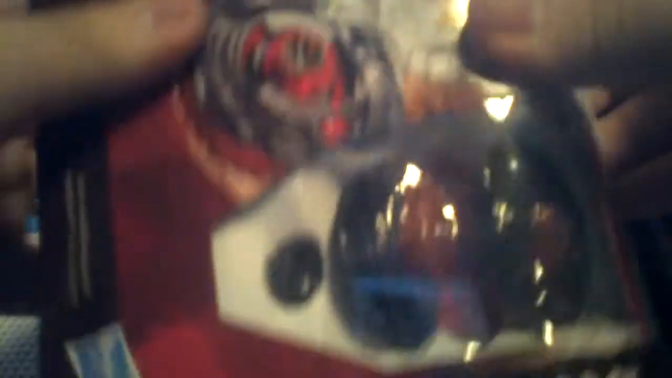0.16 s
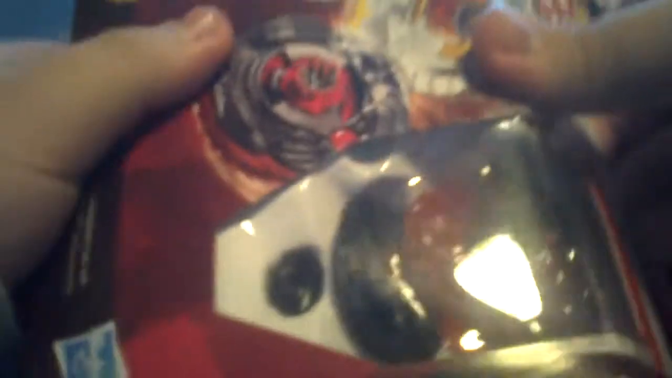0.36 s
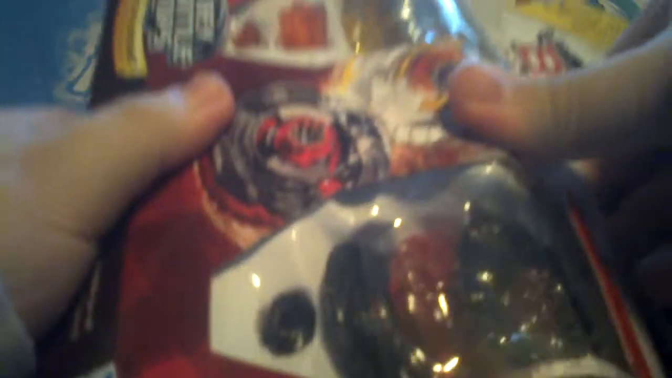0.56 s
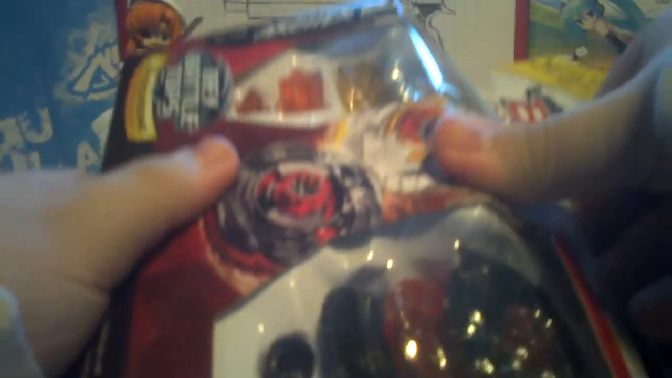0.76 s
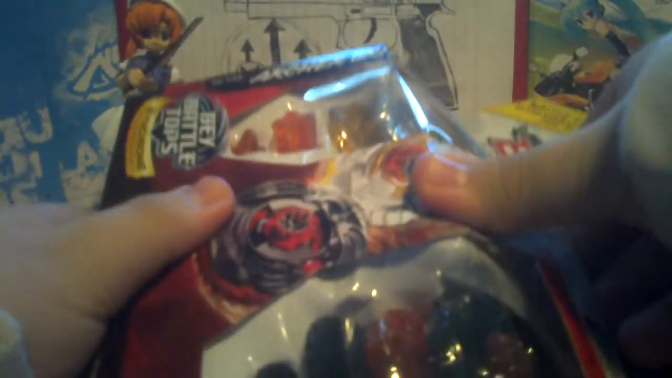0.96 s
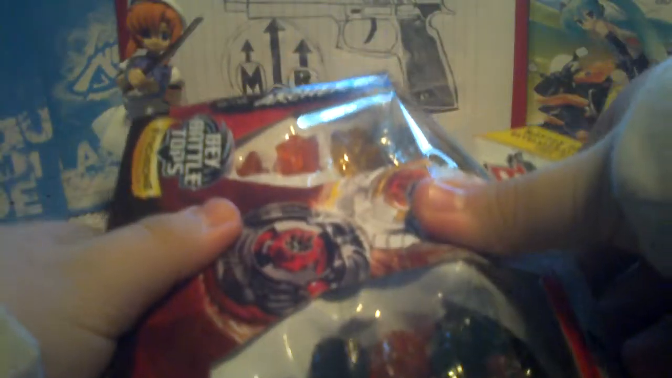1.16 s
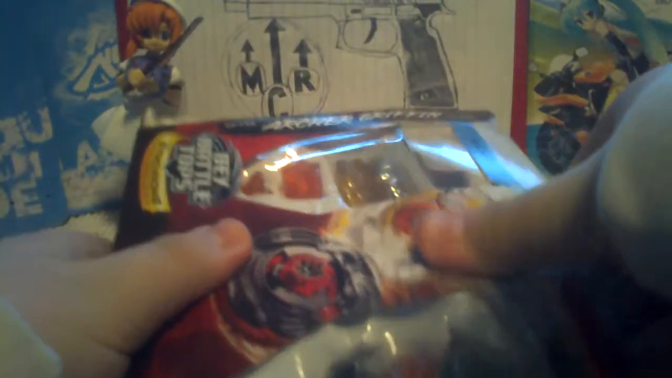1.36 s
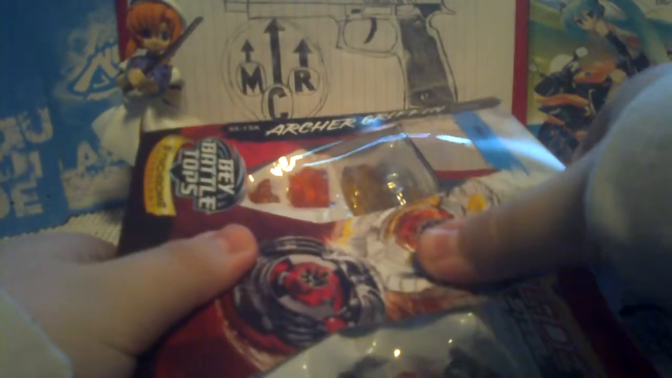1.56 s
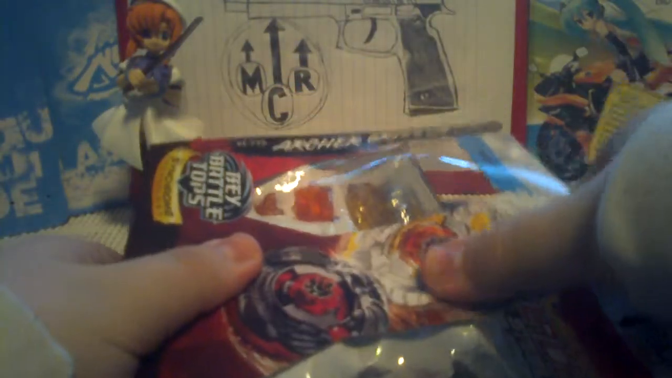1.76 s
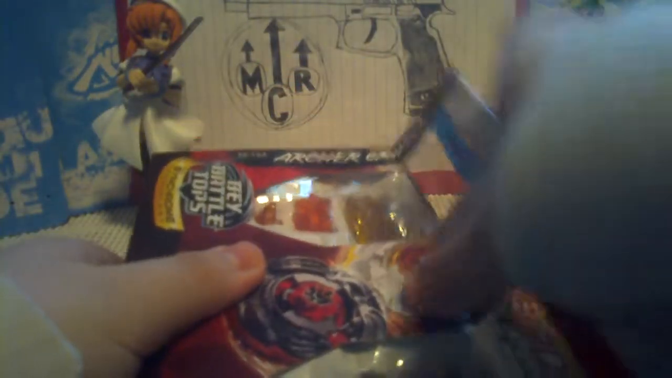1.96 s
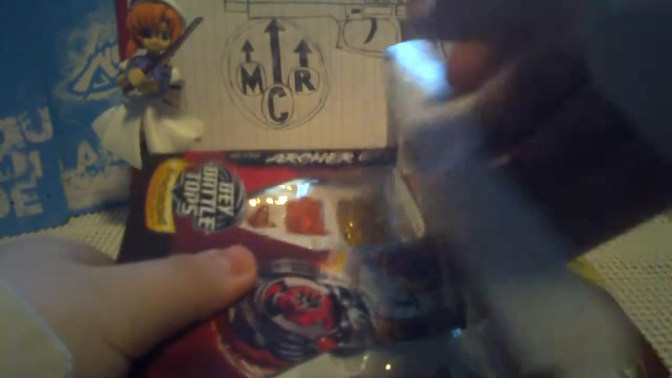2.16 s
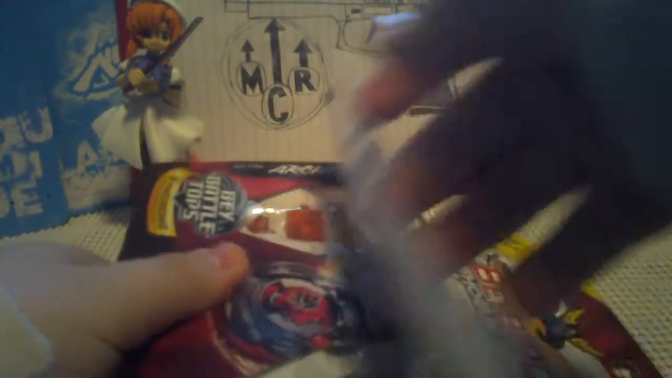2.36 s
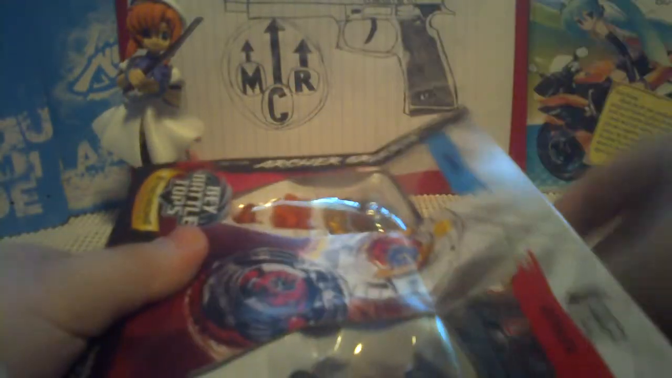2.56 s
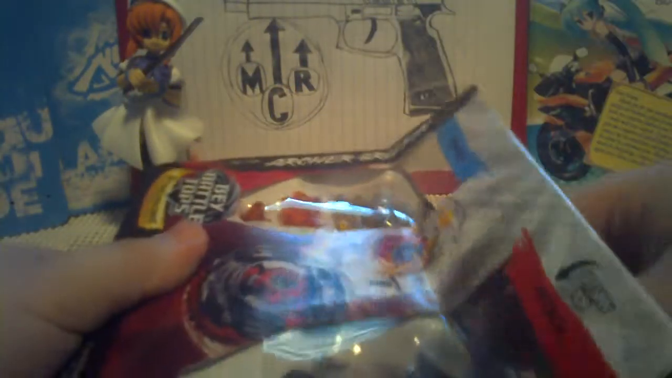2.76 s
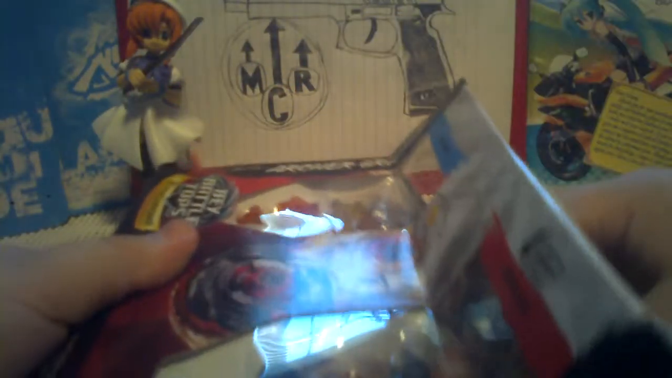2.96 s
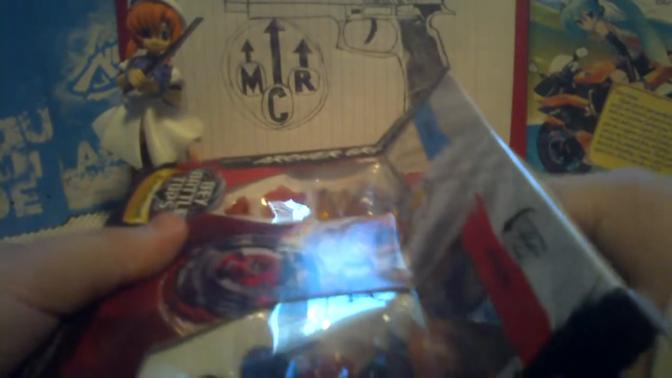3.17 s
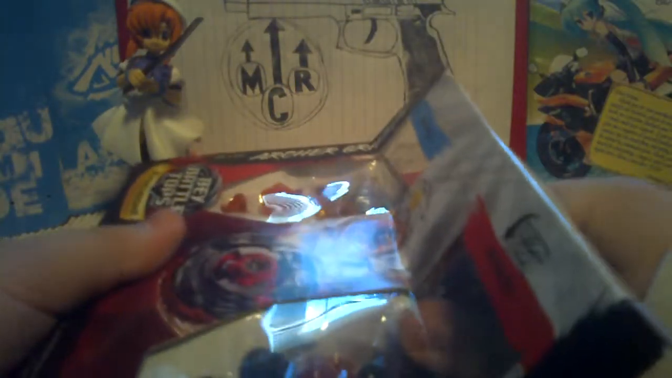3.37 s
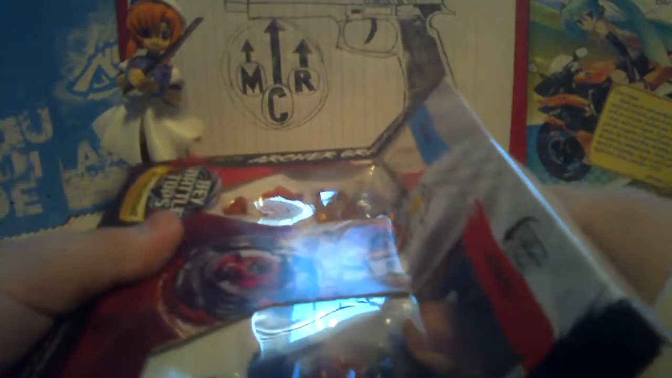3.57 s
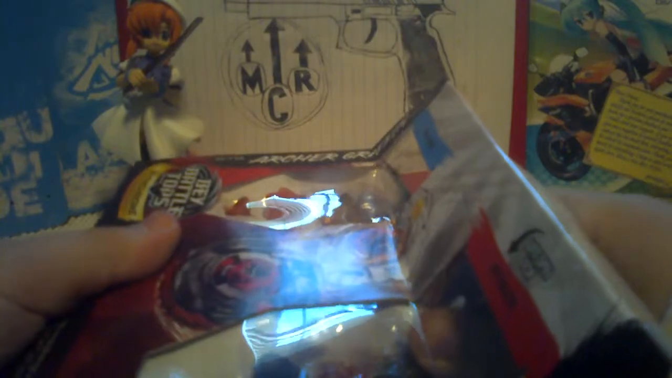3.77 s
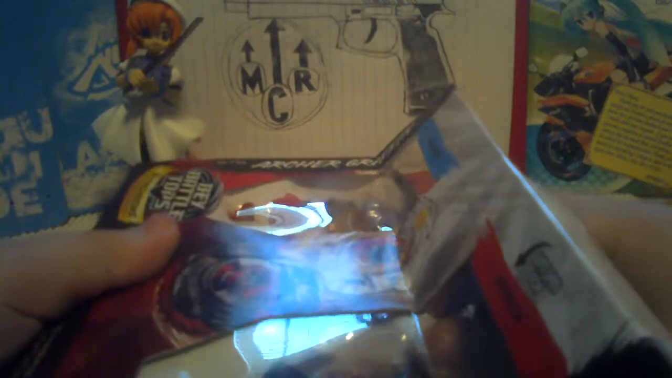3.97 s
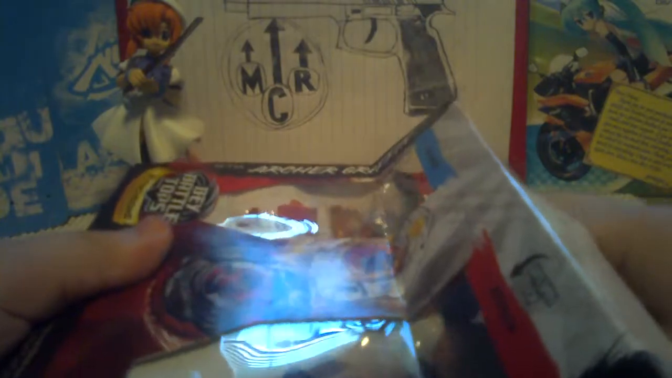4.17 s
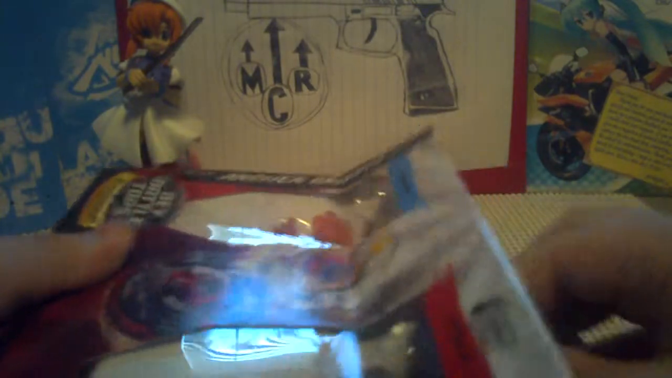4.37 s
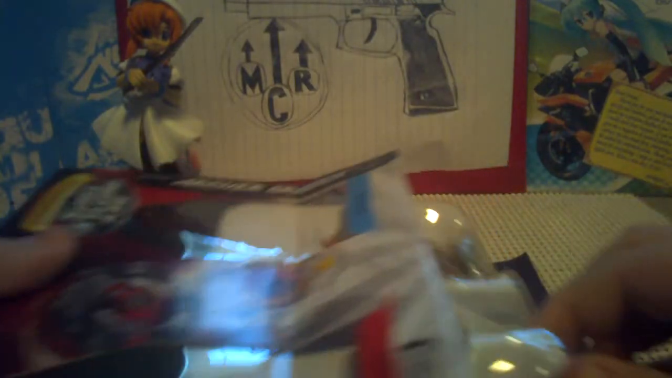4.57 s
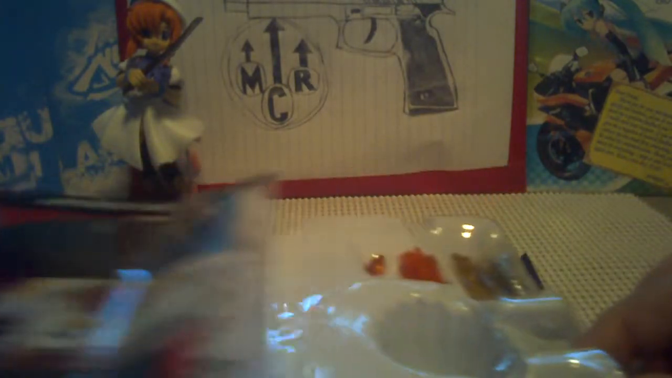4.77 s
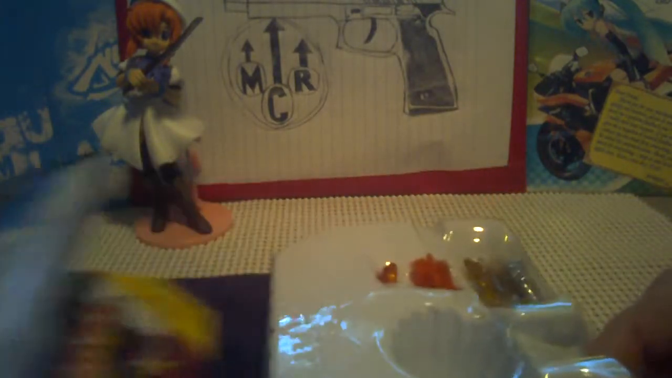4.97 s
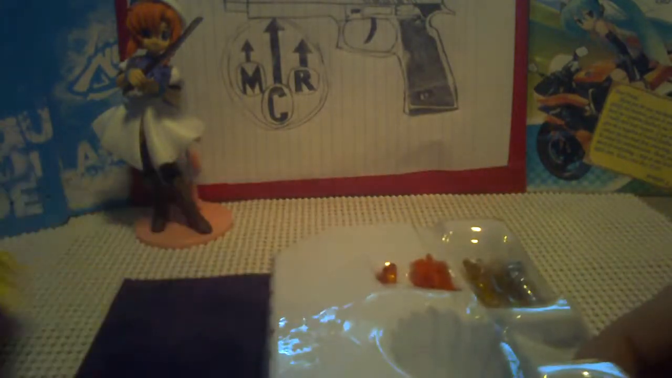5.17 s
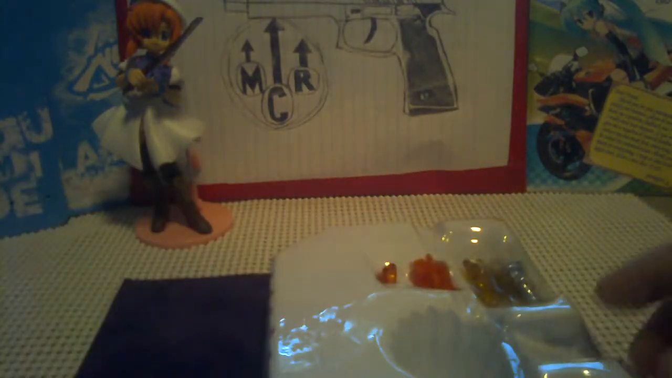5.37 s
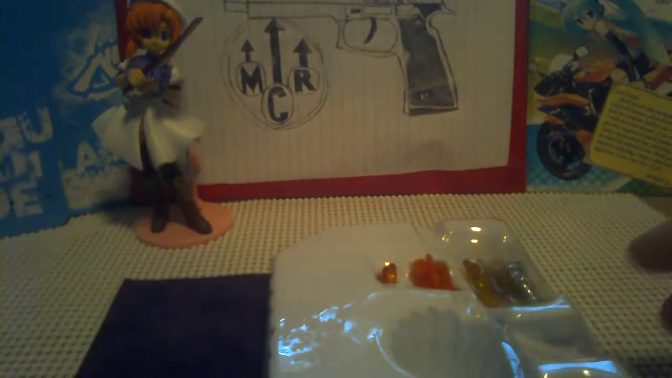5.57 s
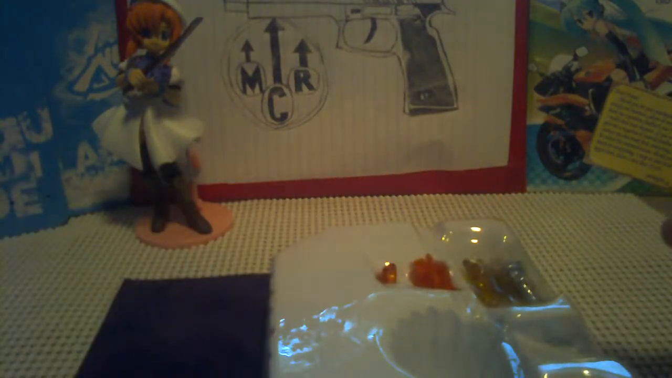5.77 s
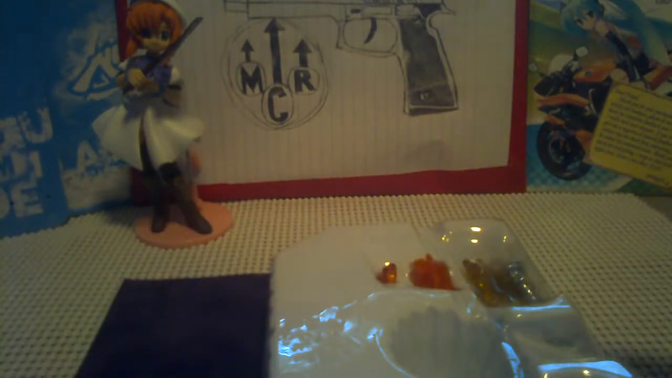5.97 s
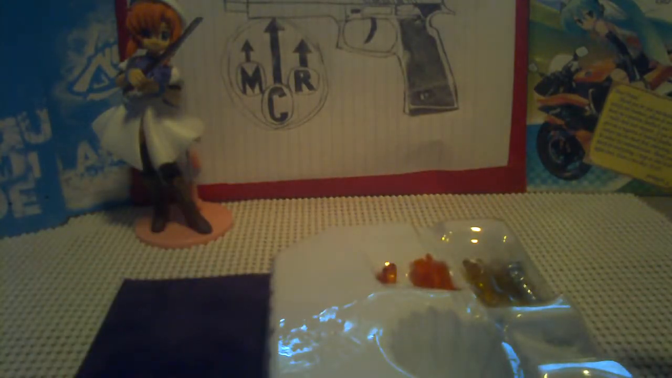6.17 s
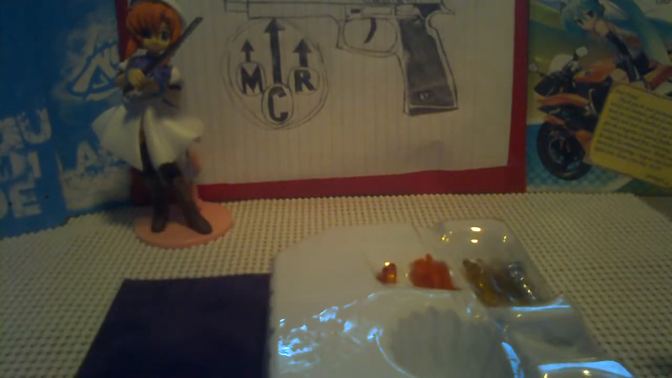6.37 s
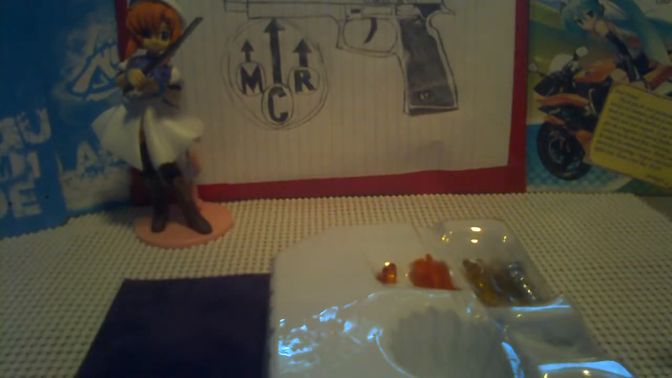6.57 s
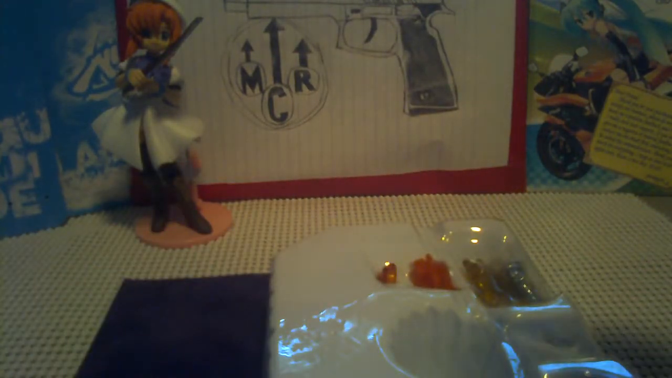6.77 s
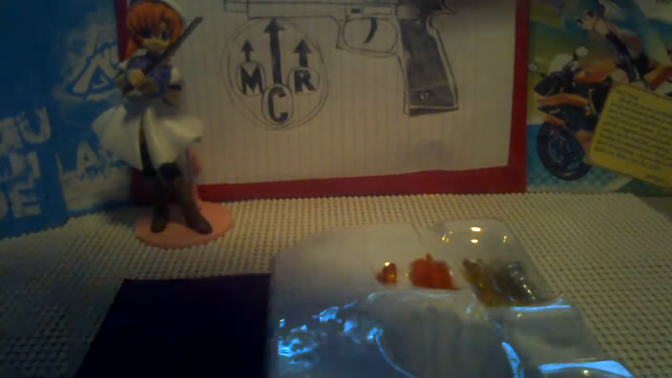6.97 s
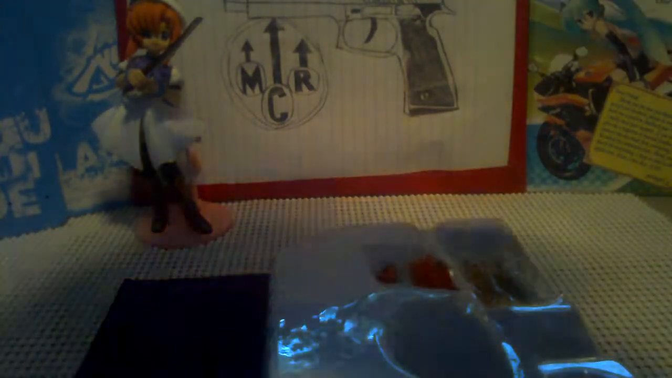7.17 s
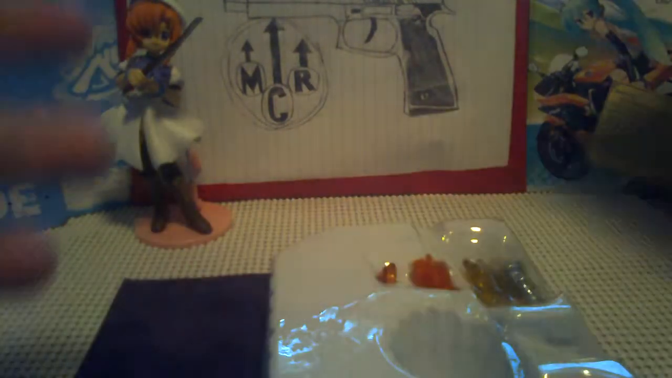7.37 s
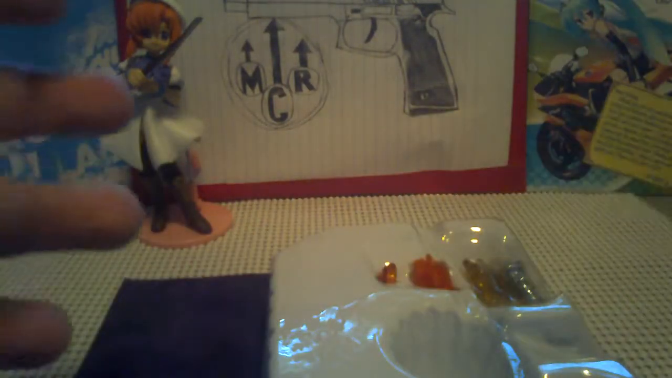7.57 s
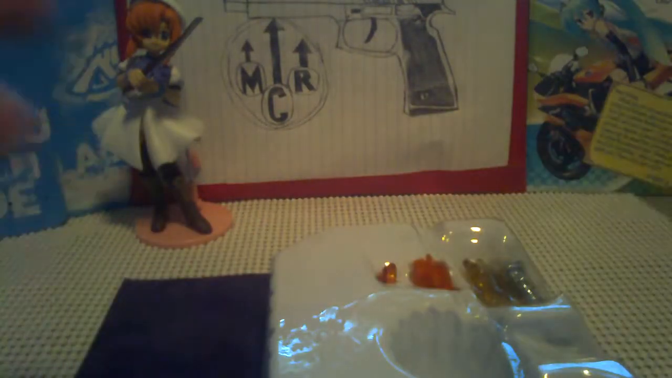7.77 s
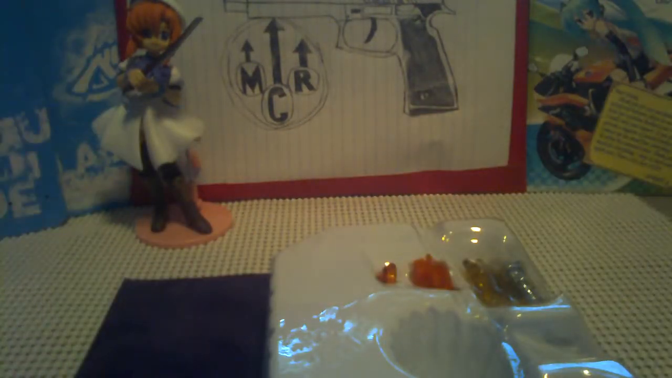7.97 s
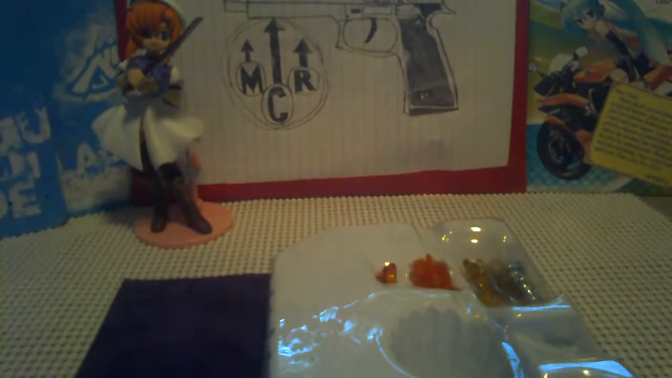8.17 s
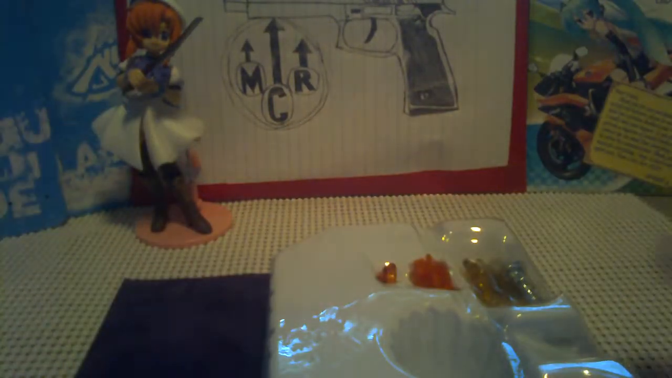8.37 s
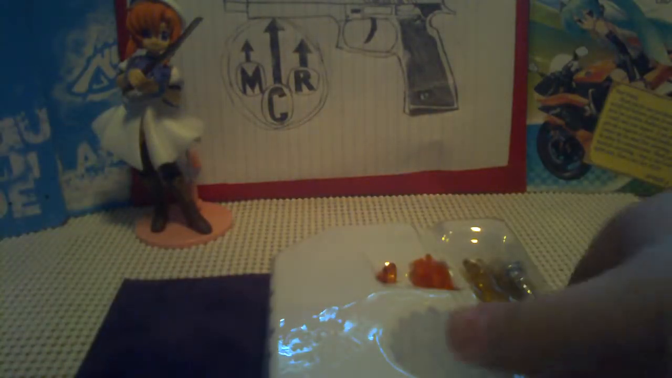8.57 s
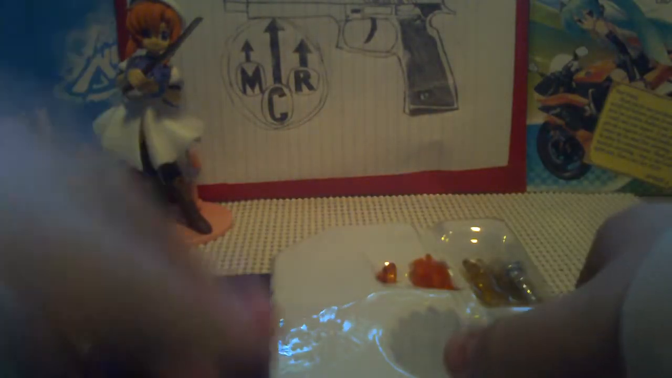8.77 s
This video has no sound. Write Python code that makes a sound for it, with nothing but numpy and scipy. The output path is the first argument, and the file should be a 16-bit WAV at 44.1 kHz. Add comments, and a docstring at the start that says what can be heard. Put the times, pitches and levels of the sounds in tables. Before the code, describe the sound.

Hands pry a stiff plastic shell from card very close to a small microphone. Dull crackles and ticks lead to loud buckling pops within the first two seconds, then quieter, finer crackling. A long bright rasp follows as the tray slides free. Afterwards mostly soft fan murmur, with a few desk knocks, scuffs and faint late clicks in a small room.

```python
"""Hands pry a stiff plastic blister off its card, close to a small camera microphone in a small room.
Under it all a fan murmurs. From the start each pull drags card over the shell as random micro-slips,
and creases tick as bursts of sheet modes; soon the shell buckles with loud pops. Then the tray slides
out in one long rasp of dense slips and judders free. Soft knocks on the desk run through the handling,
and at the end the parts knock down there, as decaying resonances, with a few late pops and scuffs."""
import sys
import numpy as np
from scipy import signal
from scipy.fft import rfft, irfft
from scipy.io import wavfile
from scipy.ndimage import uniform_filter1d

SR = 44100
rng = np.random.default_rng(int(sys.argv[2]) if len(sys.argv) > 2 else 0)


def dump_mix(stems):
    """Bounce the given channels to the path in sys.argv[1] as a 16-bit WAV at rate SR."""
    frames = np.atleast_2d(stems).T  # one column per channel
    limited = np.clip(frames, -1, 1)  # hard clip at full scale
    pcm = np.round(limited * 32767).astype(np.int16)
    wavfile.write(sys.argv[1], SR, pcm)


N = 388521
TIME = np.arange(N) / SR
ATTACK_S = 0.01  # struck sounds are levelled over this first stretch
SLOW_DB, FREE_DB = -36, -19.5  # drag levels of a slow pull and of a free slide

# what the plastic sheet radiates in its three ranges: (frequency [Hz], level [dB])
SHEET_LOW = [(25, -37), (50, -24), (90, -4.5), (170, 0), (330, 7.5), (470, 2.5), (700, -46.5)]
SHEET_MIDDLE = [(60, -45), (250, -25.5), (520, -5.5), (740, 4), (1120, 4), (1430, -6), (1660, -2),
                (2020, -2), (2300, -10.5), (3100, -13.5), (5000, -50)]
SHEET_TREBLE = [(1200, -33), (2300, -1), (2900, 3.5), (3500, 3.5), (4700, -3), (5600, -1), (7000, -3),
                (8400, -11), (9500, -10), (11500, -20.5), (13000, -29.5), (15300, -42)]


def undb(db):
    """Decibels to gain."""
    return 10 ** (np.asarray(db) / 20)


def unit(x, span=None):
    """Scale to rms 1, over the first span seconds if given."""
    head = x if span is None else x[:int(span * SR)]
    return x / np.sqrt(np.mean(head ** 2) + 1e-18)


def add(track, at, x):
    """Mix x into the track at a time in seconds."""
    i = max(int(at * SR), 0)
    track[i:i + len(x)] += x[:max(N - i, 0)]


def response(points, size=4096):
    """Causal (minimum-phase) impulse response of a (Hz, dB) spectrum."""
    hz, db = np.transpose(points)
    grid = np.maximum(np.fft.rfftfreq(size, 1 / SR), 1)
    level_db = np.interp(np.log(grid), np.log(hz), db)
    # folding the cepstrum forward puts all the energy after the blow
    cepstrum = irfft(np.log(undb(level_db)))
    cepstrum[1:size // 2] *= 2
    cepstrum[size // 2 + 1:] = 0
    return irfft(np.exp(rfft(cepstrum)))[:size // 2]


def through(x, h):
    """Filter x by an impulse response."""
    return signal.fftconvolve(x, h)[:len(x)]


def highpass(x, hz):
    """Take away what lies below a frequency."""
    return signal.sosfilt(signal.butter(2, hz, "high", fs=SR, output="sos"), x)


def fade(t, t60):
    """Exponential decay, 60 dB down after t60 seconds."""
    return np.exp(-np.log(1000) * t / max(t60, 1e-3))


def mode(t, hz, t60):
    """One struck resonance: a decaying sine."""
    return np.sin(2 * np.pi * hz * t) * fade(t, t60)


def burst(t, t60, spike):
    """A sudden jump, then its reflections running about the sheet as decaying noise."""
    x = rng.standard_normal(len(t)) * fade(t, t60)
    x[0] += spike * np.sqrt(np.sum(x ** 2))
    return x


def grains(n, rate, spread_db):
    """Random micro-slips of uneven size, smaller where they are denser, at rms 1 overall."""
    hit = rng.random(n) < rate / SR
    scatter = np.clip(rng.standard_normal(n), -2, 2)
    sizes = undb(spread_db * scatter) * rng.choice([-1, 1], n)
    return unit(hit * sizes / np.sqrt(rate))


SHEET = [response(points) for points in (SHEET_LOW, SHEET_MIDDLE, SHEET_TREBLE)]


def fan():
    """Steady low murmur of a fan, with hiss above it: noise shaped by one spectrum."""
    # fan and microphone hiss: (frequency [Hz], relative level [dB per Hz])
    fan_spectrum = [(20, -24), (70, -16), (100, -1.5), (130, -8.5), (165, -1), (200, -7.5), (250, -0.5),
                    (330, -8.5), (500, -15.5), (1000, -20), (2000, -29.5), (3200, -36.5), (7000, -40),
                    (15000, -45)]
    murmur = through(rng.standard_normal(N), response(fan_spectrum, size=8192))
    return undb(-38.5) * unit(murmur)


def drag():
    """Level and relative treble of the dragging, in dB: each pull builds, holds and lets go; then the slide."""
    # each pull of card over the shell: (start [s], time to release [s], level [dB], treble re level [dB])
    pulls = [(0.0, 0.12, -36, -19.5), (0.127, 0.12, -33.5, -24), (0.359, .09, -40.5, -13.5),
             (0.496, .085, -33, -17), (0.674, .07, -40, -22), (0.866, 0.041, -34.5, -11.5),
             (0.938, 0.13, -30, -10.5), (1.121, 0.096, -31.5, -12), (1.368, 0.079, -27, -14),
             (1.48, 0.065, -37.5, -22), (1.823, 0.29, -36.5, -11.5), (2.115, 0.24, -38.5, -8.5),
             (2.401, 0.22, -38.5, -7.5), (2.64, 0.21, -45.5, -8), (2.818, 0.13, -40.5, -8.5),
             (3.003, .04, -40, -3.5), (3.086, 0.085, -41, -11), (3.214, 0.12, -44.5, -10),
             (3.409, 0.17, -37.5, -7.5), (3.615, 0.14, -39.5, -2), (3.801, 0.17, -40, -8),
             (4.0, 0.12, -37, -17.5), (4.105, 0.12, -34, -17), (7.8, 0.12, -40, -9.5),
             (8.587, 0.056, -39, -4)]
    # the tray slides out in one long stroke: (time [s], level [dB], treble re level [dB])
    slide = [(4.255, -32.5, -15), (4.33, -18.5, -7.5), (4.39, -21.5, -10), (4.52, -19, -9.5),
             (4.728, -21, -7.5), (4.774, -33.5, -4), (4.879, -26, -3.5), (4.979, -25, -6.5),
             (5.03, -35.5, -1), (5.2, -40.5, -4.5), (5.48, -53.5, -7)]
    attack_s, release_t60_s = 0.018, 0.2

    s, slide_db, slide_bright_db = np.transpose(slide)
    sliding = (TIME >= s[0]) * (TIME <= s[-1])
    middle = undb(np.interp(TIME, s, slide_db)) * sliding
    treble = middle * undb(np.interp(TIME, s, slide_bright_db))
    t = TIME[:SR]
    for start, length, pull_db, pull_bright_db in pulls:
        build = np.minimum(t / attack_s, 1)
        release = fade(np.maximum(t - length, 0), release_t60_s)
        pull = undb(pull_db) * build * release
        add(middle, start, pull)
        add(treble, start, pull * undb(pull_bright_db))
    middle_db, treble_db = 20 * np.log10(np.array([middle, treble]) + 1e-9)
    return middle_db, treble_db - middle_db


def speed_of(level_db):
    """0 for a slow drag, 1 for a free slide, judged by the level of the drag."""
    return np.clip((level_db - SLOW_DB) / max(FREE_DB - SLOW_DB, 1), 0, 1)


def bending(x, t60, direct, count=90):
    """The sheet keeps changing shape, so its resonances melt from one set into the next."""
    out, step, t = np.zeros(N), N // count, TIME[:SR // 20]
    for start in range(-step, N, step):
        i = np.arange(max(start, 0), min(start + 2 * step, N))
        shape = burst(t, t60, direct)
        shape = shape / np.sqrt(np.sum(shape ** 2))
        part = x[i] * np.sin(np.pi * (i - start) / (2 * step))
        add(out, i[0] / SR, signal.fftconvolve(part, shape))
    return out


def rubbing(level_db, treble_db):
    """Card drags on plastic: sparse dull crackle when slow, a dense bright rasp when it slides out."""
    slips_per_s, slip_growth = 500, 0.97  # rate of a slow drag; dB of rate per dB of drag
    catch_db, catch_easing = 3.5, 0.75  # flutter of the grip, and how far speed lowers it
    corner_db = -11  # ring of the tray's corners in a free slide

    rate = np.clip(slips_per_s * undb(slip_growth * (level_db - SLOW_DB)), 170, 4000)
    speed = speed_of(level_db)
    # the grip catches and lets go many times a second; speed shrinks this, then turns it over, shallower
    holds = np.repeat(rng.standard_normal(N // 400 + 1), 400)
    catch = unit(uniform_filter1d(holds, 300))[:N]
    slips = grains(N, rate, spread_db=3) * undb(catch_db * (0.5 - catch_easing * speed) * catch)

    body = bending(slips, t60=0.029, direct=0.91)
    skin = bending(slips, t60=0.009, direct=1.4)
    low, middle, treble = (unit(through(x, h)) for x, h in zip((body, body, skin), SHEET))
    # a slow drag mostly rings the lowest flexing resonance of the shell
    t = TIME[:SR // 20]
    flex = unit(through(through(body, SHEET[1]), mode(t, hz=743, t60=0.011)))
    share = np.clip(0.54 * (1 - speed), 0, 1)
    middle = np.sqrt(1 - share) * middle + np.sqrt(share) * flex
    # a free slide also rings the stiff corners of the tray
    corners = unit(through(body, mode(t, hz=1930, t60=0.0025)))
    middle = unit(middle + undb(corner_db) * speed * corners)
    low_gain = undb(-5.5 - 6 * speed)
    return undb(level_db) * (low_gain * low + middle + undb(treble_db) * treble)


def snap(low_db, middle_db, treble_db, ring_hz, t60, ring_share, treble_t60):
    """A crease jumps: a dense cloud of sheet modes, new for each bend, and the ring of one facet."""
    # the fine edge of a hard snap: (frequency [Hz], level [dB])
    edge_spectrum = [(4000, 2.5), (5600, -7), (7000, 2), (9000, 3), (12000, -3.5), (15300, -14.5)]
    t = TIME[:SR // 12]
    decays = (1.72 * t60, t60, treble_t60)
    low, middle, treble = (unit(through(burst(t, decay, spike=0.5), h), ATTACK_S)
                           for h, decay in zip(SHEET, decays))
    facet = mode(t, ring_hz, 1.42 * t60) - 0.44 * mode(t, 0.784 * ring_hz, t60)
    facet = unit(facet, ATTACK_S)
    share = np.clip(ring_share, 0, 1)
    middle = unit(np.sqrt(1 - share) * middle + np.sqrt(share) * facet, ATTACK_S)
    # the brighter the snap, the further its edge reaches into the top octave
    edge_db = treble_db - 7.5 + np.clip(treble_db - middle_db, -15, 5)
    edge = unit(through(burst(t, 0.008, spike=0.51), response(edge_spectrum, size=512)), ATTACK_S)
    return undb(low_db) * low + undb(middle_db) * middle + undb(treble_db) * treble + undb(edge_db) * edge


def tick(level_db, bright_db, ring_hz):
    """One crease snaps; a bright one has less bass."""
    low_db = level_db - 15.5 - 0.48 * bright_db
    return snap(low_db, level_db, level_db + bright_db, ring_hz, t60=0.035, ring_share=0.35, treble_t60=0.023)


def crackle(level_db, bright_db, count=170):
    """Small creases give way at random while the pack is worked, stronger with the drag that loads them."""
    handling_s, chance = 5.4, 0.7  # span of the tries, and how many of them sound
    over_drag_db, spread_db = -0.5, 3  # size over the drag and its scatter
    treble_db, treble_spread_db = 2.5, 2.8  # treble over that of the drag and its scatter
    facet_hz, facet_octaves = 856, 0.39  # facet ring and its scatter

    out = np.zeros(N)
    timing = rng.random((count, 2))
    character = rng.standard_normal((count, 3))
    for k, ((when, luck), (size, bright, facet)) in enumerate(zip(timing, character)):
        at = handling_s * (k + when) / count
        i = int(at * SR)
        over_db = over_drag_db + spread_db * min(size, 1.5) - 4 * speed_of(level_db[i])
        crease_bright_db = bright_db[i] + treble_db + treble_spread_db * bright
        ring_hz = facet_hz * 2 ** (facet_octaves * facet)
        crease = tick(level_db[i] + over_db, crease_bright_db, ring_hz)
        add(out, at, (luck < chance) * crease)
    return out


def scuffs():
    """Short scrapes of card and fingers: swells of micro-slips that ring the facet under the finger."""
    # (middle [s], half-width to 1/e [s], low [dB], middle [dB], treble [dB], facet ring [Hz])
    scrapes = [(0.009, 0.014, -24, -27.5, -38.5, 670), (0.345, 0.023, -30.5, -27, -45, 730),
               (0.945, 0.0068, -46, -31, -26, 2100), (1.308, 0.022, -38, -20.5, -36.5, 760),
               (1.382, 0.0094, -18, -5.5, -14.5, 1960), (1.409, 0.026, -23, -23, -23, 1150),
               (1.673, 0.0085, -62, -30.5, -35.5, 2020), (1.759, 0.0081, -30, -30.5, -39.5, 860),
               (2.577, 0.006, -17.5, -11.5, -30.5, 804), (2.896, 0.02, -39, -24.5, -42, 720),
               (4.961, 0.035, -50, -20, -41, 1050), (6.095, 0.01, -30, -27, -41.5, 1264),
               (6.233, 0.011, -29.5, -29, -44, 835), (6.265, 0.013, -30, -32, -44, 640),
               (6.313, 0.015, -32, -30, -48, 680), (6.687, 0.035, -37, -39, -49, 600),
               (7.083, 0.022, -69, -45, -44.5, 1040), (7.156, 0.013, -36, -40, -44, 980),
               (7.808, 0.016, -20.5, -20.5, -34, 764), (8.044, 0.025, -35.5, -34.5, -42.5, 1000)]
    out = np.zeros(N)
    for at, length, *levels_db, ring_hz in scrapes:
        t = TIME[:int(5 * length * SR)]
        lead = min(2 * length, at)
        swell = np.exp(-np.abs((t - lead) / length) ** 2.46)
        slips = grains(len(t), 3000, 8.2) * swell
        low, middle, treble = (through(slips, h) for h in SHEET)
        facet = through(slips, mode(t, ring_hz, 0.021))
        middle = 0.55 * unit(middle) + unit(facet)
        scrape = sum(undb(db) * unit(part) for db, part in zip(levels_db, (low, middle, treble)))
        # levels hold for the energy packed into one half-width
        add(out, at - lead, scrape * np.sqrt(length * SR / len(t)))
    return out


def creases():
    """Loud ticks, big buckling pops, and runs of stick-slip: all of them snaps of the sheet."""
    # the loudest creases that snap: (time [s], level [dB], treble re level [dB], facet ring [Hz])
    ticks = [(0.0443, -25, -13, 710), (0.063, -27, -14, 650), (0.145, -25, -10.5, 600),
             (0.189, -24.5, -12, 846), (0.251, -29, -14, 737), (0.265, -32, -7, 1000),
             (0.433, -27, -16, 710), (0.479, -27.5, -10, 630), (0.586, -31, -12, 570),
             (0.692, -26.5, -17, 730), (0.701, -28, -11.5, 700), (0.739, -29.5, -12, 730),
             (0.829, -27, -15.5, 730), (0.845, -29, -8.5, 1940), (0.8769, -26, -13, 790),
             (0.927, -30, -12, 690), (0.95, -22, 5, 2270), (1.093, -19, 0.5, 2000),
             (1.164, -24.5, -9.5, 910), (1.201, -22, -13.5, 750), (1.232, -31.5, -9, 980),
             (1.324, -19, -14, 715), (2.038, -28.5, -7.5, 765), (2.296, -38, 0, 740),
             (2.365, -27, -11.5, 770), (2.446, -26.5, -2.5, 736), (2.465, -30.5, 4, 800),
             (2.888, -24.5, -16, 770), (2.973, -26.5, -12.5, 744), (3.025, -31, -12, 764),
             (3.128, -26, -9, 756), (3.162, -26.5, -10, 774), (3.224, -31, -3.5, 1720),
             (3.2853, -36, -5, 714), (3.5219, -22, -11, 1630), (3.566, -22.5, -7, 730),
             (3.578, -27, -4.5, 726), (3.656, -17, 3, 1620), (3.682, -24, -5.5, 795),
             (3.82, -31.5, -2, 1680), (3.897, -31.5, -3, 1030), (3.929, -20, -3, 1620),
             (3.9635, -32, -2, 745), (4.147, -26, -3.5, 2050), (4.19, -22.5, -5.5, 1930),
             (4.25, -20.5, -8.5, 1900), (4.346, -17, -3, 1140), (4.354, -15.5, -8, 860),
             (4.416, -19.5, -9, 730), (4.509, -13.5, -15, 1700), (4.785, -24.5, -9, 1180),
             (5.001, -29.5, 2, 870), (5.218, -41.5, 14, 710), (5.2475, -32, -6, 700),
             (5.305, -35.5, -8, 816), (5.353, -36.5, -10, 1195), (7.885, -34, -3, 940),
             (8.601, -34, -10, 730), (8.767, -33, -13.5, 1080)]
    # the shell buckles: (time [s], low [dB], middle [dB], treble [dB], facet ring [Hz], middle t60 [s])
    pops = [(1.381, -20, -8, -12.5, 1780, 0.059), (1.397, -29, -9.5, -17.5, 1000, 0.042),
            (1.442, -22.5, -6, -21, 1133, 0.047), (1.451, -11.5, -11, -16.5, 1070, 0.019),
            (1.56, -22.5, -22, -46, 665, 0.026), (1.865, -16, -2, -14.5, 893, 0.03),
            (1.924, -17.5, -5.5, -25, 932, 0.024), (4.4805, -22.5, -8.5, -25, 895, 0.018),
            (7.778, -18, -25, -21.5, 714, 0.026), (7.783, -22.5, -19, -25.5, 1320, 0.038)]
    # an edge sticks and slips: (start [s], end [s], slips [per s], mean middle [dB], mean treble [dB])
    judders = [(3.393, 3.515, 139, -39.5, -47), (3.611, 3.645, 68, -36, -38.5),
               (3.837, 3.865, 88, -36, -38), (5.024, 5.105, 81, -28, -40), (5.259, 5.3, 59, -43, -53),
               (8.624, 8.648, 110, -40, -44)]

    out = np.zeros(N)
    for at, *colour in ticks:
        add(out, at, tick(*colour))
    for at, *colour, t60 in pops:
        add(out, at, snap(*colour, t60=t60, ring_share=0.2, treble_t60=0.021))
    for start, end, rate, middle_db, treble_db in judders:
        for at in np.arange(start, end, 1 / rate):
            late, force_db = rng.standard_normal(2)
            slip = snap(middle_db - 18, middle_db, treble_db, 1580, t60=0.024, ring_share=0.09, treble_t60=0.011)
            add(out, at + 0.08 * late / rate, undb(force_db) * slip)
    return out


def knocks():
    """Pack, parts and hands meet the desk: a dull thud of the boards with the clack of the thing that lands."""
    # (time [s], thud [dB], thud pitch [Hz], nominal thud t60 [s], clack [dB], clack pitch [Hz])
    landings = [(0.34, -20, 132, 0.049, -57, 800), (2.462, -31.5, 105, 0.06, -42, 800),
                (2.576, -27, 300, 0.048, -17, 720), (2.902, -21.5, 224, 0.082, -21, 740),
                (4.723, -21, 126, 0.11, -56, 800), (6.141, -22.5, 226, 0.055, -39, 702.4),
                (6.704, -27.5, 238, 0.095, -38, 706), (7.061, -33, 62, 0.18, -54, 910),
                (7.19, -13.5, 234.5, 0.045, -18, 837), (7.614, -30.5, 387, 0.12, -26, 970),
                (7.778, -18, 248, 0.18, -29, 810), (7.814, -28, 98, .25, -42, 910),
                (8.044, -32, 89, 0.084, -55, 800)]
    # the desk and the tray on it: (frequency [Hz], t60 before each knock damps it [s], level [dB])
    desk_modes = [(608, 0.12, 3), (762, 0.048, 6), (990, .12, -26), (1240, 0.14, -11), (1970, 0.06, -11)]

    out, t = np.zeros(N), TIME[:SR // 3]
    tray = unit(sum(undb(db) * mode(t, hz, t60) for hz, t60, db in desk_modes), ATTACK_S)
    push = 1 - fade(t, 0.0038)  # a padded contact builds over a millisecond or two
    for at, thud_db, hz, t60, clack_db, clack_hz in landings:
        boards = unit(through(burst(t, 1.7 * t60, spike=0.18), SHEET[0]), ATTACK_S)
        tone = unit(mode(t, hz, 1.05 * t60), ATTACK_S)
        thud = unit(tone + 0.54 * boards, ATTACK_S)
        ring = unit(mode(t, clack_hz, 0.032), ATTACK_S)
        clack = unit(ring + 0.78 * tray * fade(t, 1.3 * t60), ATTACK_S)
        add(out, at, push * (undb(thud_db) * thud + undb(clack_db) * clack))
    return out


def room(x, wet_db, t60, bright_db, bright_t60):
    """Near walls answer after a few milliseconds and die away quickly; the treble lingers a little longer."""
    t = TIME[:SR // 2]
    arrival = np.clip((t - 0.004) / 0.0086, 0, 1)
    tails = [rng.standard_normal(len(t)) * fade(t, decay) * arrival for decay in (t60, bright_t60)]
    near, late = (tail / np.sqrt(np.sum(tail ** 2)) for tail in tails)
    late = highpass(late, 3000)
    # colour of the walls: (Hz, dB)
    colour = response([(100, 0), (800, -6), (2500, -5.0), (6000, -3.5), (11000, -1.5), (15000, -19)])
    echo = through(undb(wet_db) * near + undb(bright_db) * late, colour)
    return x + through(x, echo)


def scene():
    """All the handling, in the room, over the fan."""
    level_db, bright_db = drag()
    plastic = rubbing(level_db, bright_db) + crackle(level_db, bright_db) + scuffs() + creases()
    plastic = highpass(plastic, 70)  # a thin sheet radiates no deep bass
    desk = highpass(knocks(), 45)
    handling = room(plastic + desk, wet_db=-13.5, t60=0.17, bright_db=-17.5, bright_t60=0.27)
    return (handling + fan())[None]


def record(dry):
    """The microphone's housing notches the treble; the loudest pops overload the input, which rounds them."""
    # narrow cancellations in the housing: (frequency [Hz], width [Hz])
    notches = [(3935, 496), (6215, 130), (7870, 890), (12430, 820)]
    for hz, width in notches:
        dry = signal.lfilter(*signal.iirnotch(hz, hz / width, fs=SR), dry)
    # one steep treble limit ahead of the overload, and a higher one after it
    dry = signal.sosfilt(signal.ellip(10, 0.2, 70, 15300, fs=SR, output="sos"), dry)
    clipped = dry / (1 + dry ** 8) ** (1 / 8)
    return signal.sosfilt(signal.ellip(10, 0.2, 70, 16400, fs=SR, output="sos"), clipped)


dry = scene()
out = record(dry)
dump_mix(out)
```